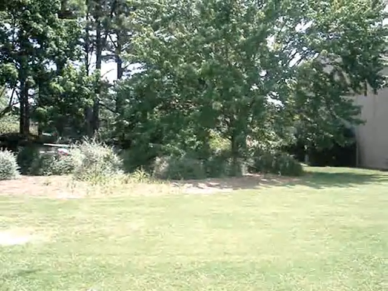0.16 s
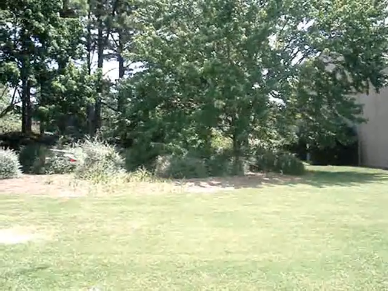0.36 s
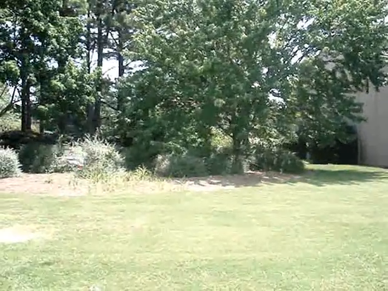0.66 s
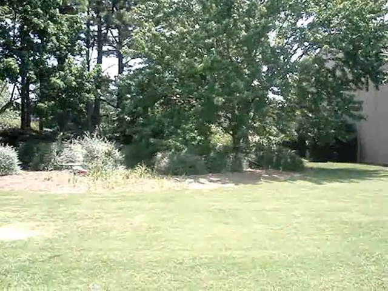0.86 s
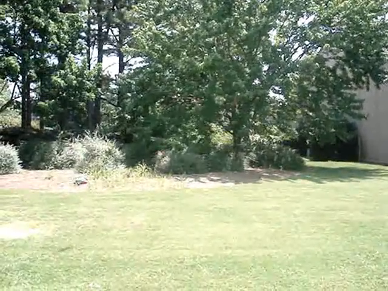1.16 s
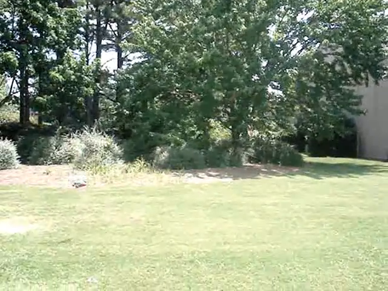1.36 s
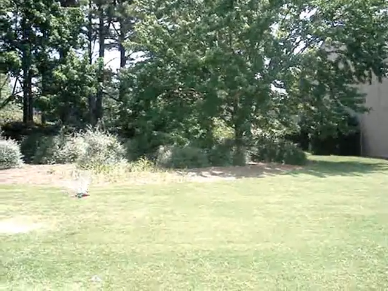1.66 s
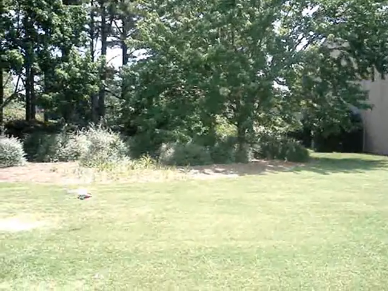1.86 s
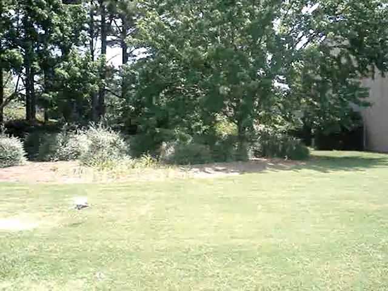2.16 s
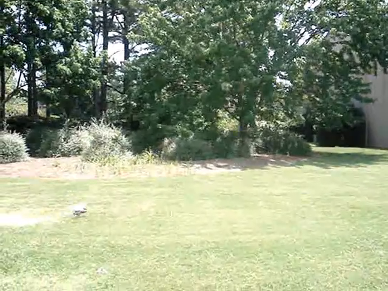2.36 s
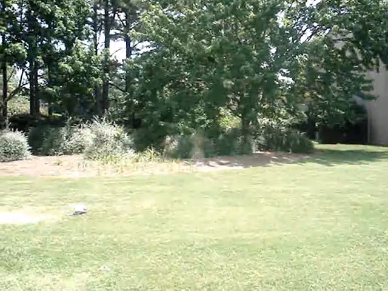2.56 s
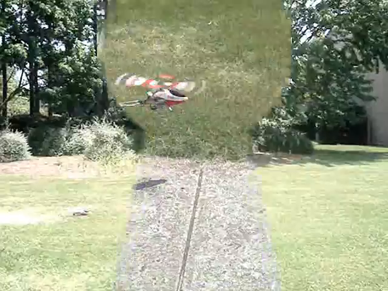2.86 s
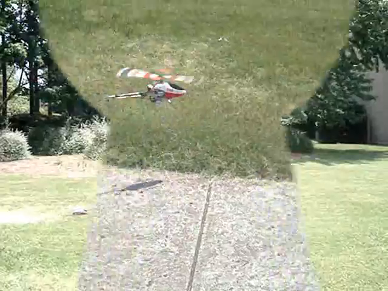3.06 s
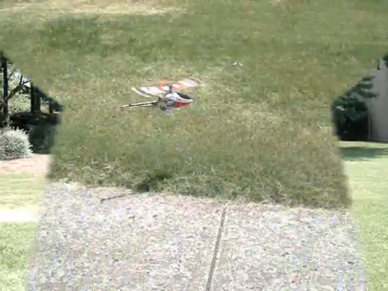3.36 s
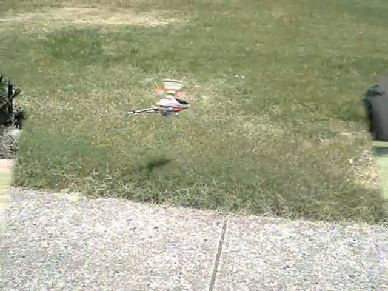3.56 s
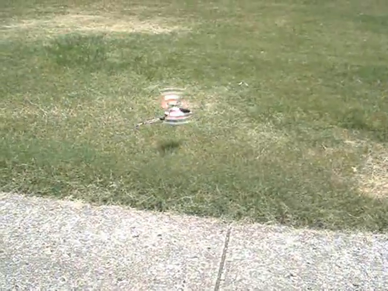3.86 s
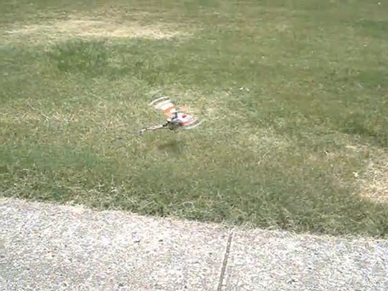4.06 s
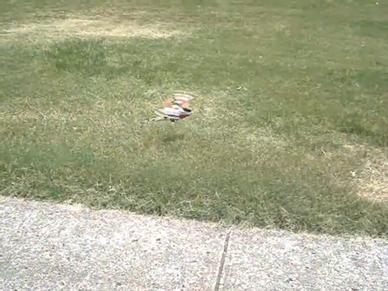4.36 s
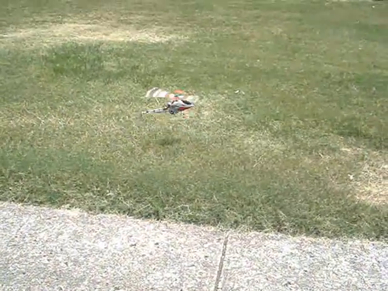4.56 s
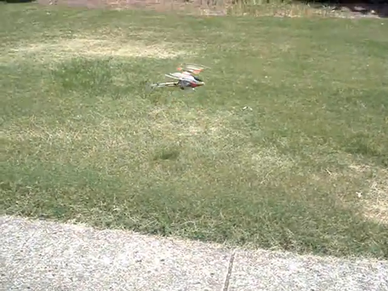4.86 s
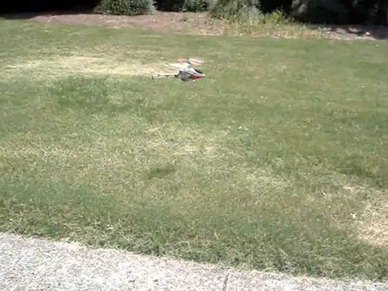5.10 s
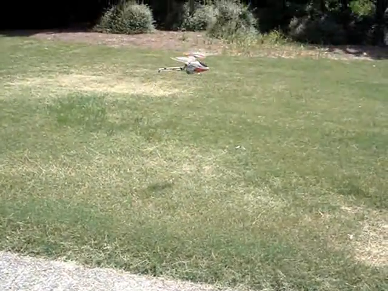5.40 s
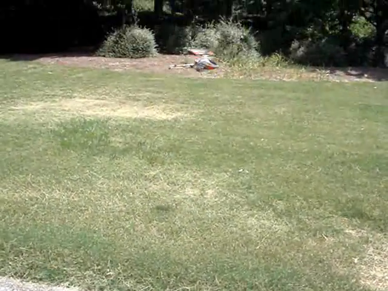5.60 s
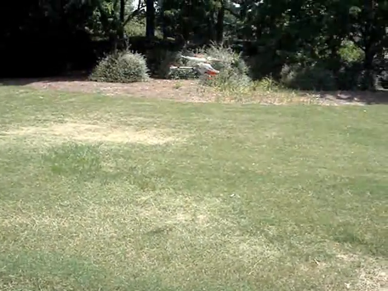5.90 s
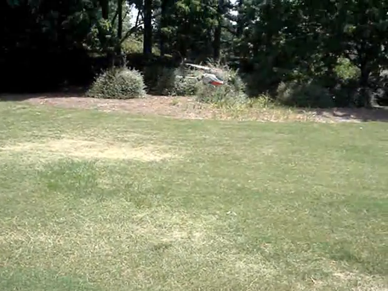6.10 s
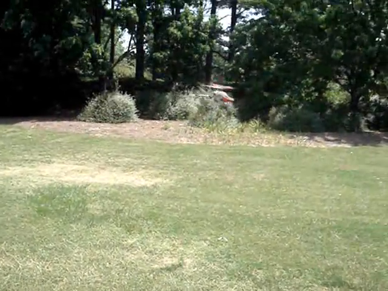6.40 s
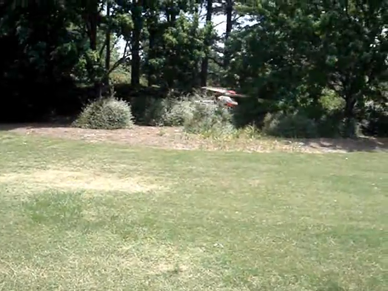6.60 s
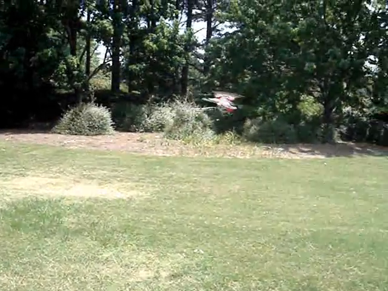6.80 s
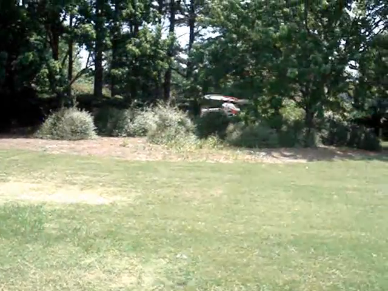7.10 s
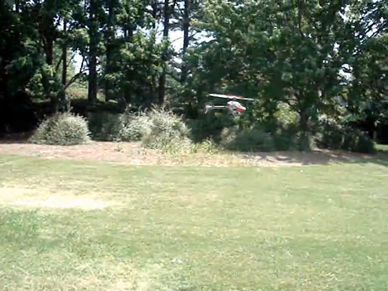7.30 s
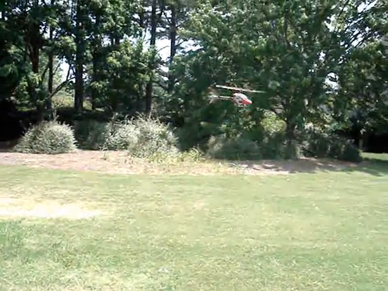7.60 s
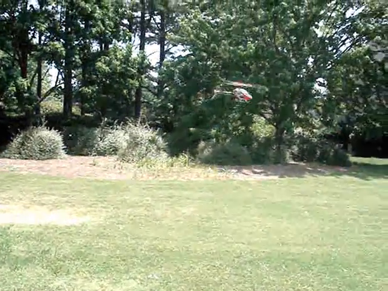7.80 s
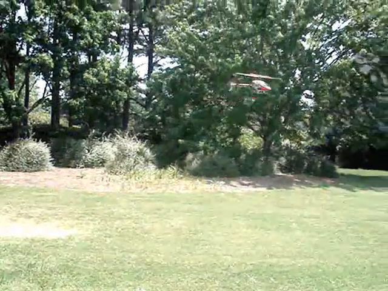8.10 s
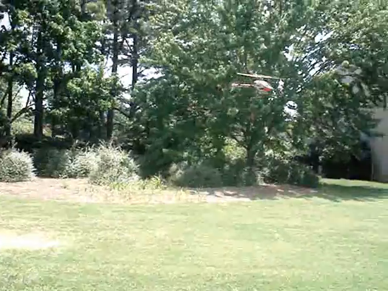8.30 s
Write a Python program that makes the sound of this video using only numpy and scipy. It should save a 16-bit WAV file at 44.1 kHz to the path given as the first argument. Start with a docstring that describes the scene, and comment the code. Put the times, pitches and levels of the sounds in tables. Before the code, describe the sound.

Outdoors on a grassy yard, a small electric helicopter whirs at a distance, its whine wavering and dropping slightly, with faint bird chirps and light wind bumps. After a quick cross-fade it is close: a fuller buzzing motor and gear whine, throbbing rapidly over hissing blade rush, rising, then easing. Strong gusts increasingly thump and rumble on the small camera's unprotected microphone.

```python
"""Electric helicopter over a lawn

A small electric helicopter flies far off, then, after a short cross-fade, close by.
Motor and gears whine at multiples of the motor speed and throb once per rotor turn; the blades rush as
pulsing noise, and a delayed, dulled copy of it all bounces off the lawn. Sliding sines make faint bird chirps.
Wind rumbles, flutters and buffets the microphone of a small camera that samples slowly and mirrors its treble."""
import sys
import numpy as np
from scipy import signal
from scipy.fft import rfft, irfft, next_fast_len
from scipy.io import wavfile

SR = 44100
rng = np.random.default_rng(int(sys.argv[2]) if len(sys.argv) > 2 else 0)


def digitize_waveform(pressure):
    """Quantize a signal to 16-bit integers and store it at the path in sys.argv[1].

    Rows of a 2-D input are taken as channels; values are limited to [-1, 1].
    """
    field = np.atleast_2d(pressure).T
    bounded = np.clip(field, -1, 1)
    quanta = np.round(bounded * 32767).astype(np.int16)
    wavfile.write(sys.argv[1], SR, quanta)


N = 372644
TIME = np.arange(N) / SR

# All spectra are shapes, scaled to rms 1 before use.
# colour of the garden air: (frequency [Hz], density [dB per Hz])
AIR_SPECTRUM = [(40, -18), (300, -11), (3000, -17), (10000, -29)]
# bird chirps: (start [s], length [s], from [Hz], to [Hz], peak level [dB])
BIRD_CHIRPS = [(1.09, .085, 3620, 3680, -41), (1.22, .035, 3800, 4450, -42), (1.893, .028, 2330, 2360, -39),
               (1.925, .07, 2440, 2370, -37), (1.995, .035, 2720, 2430, -38), (2.8, .135, 7000, 5700, -43)]

# strength of the steady wind, which drives all its layers: (time [s], strength [dB])
STEADY_WIND = [(0.0, -31.5), (0.38, -49), (0.75, -35.5), (1.45, -45.5), (2.1, -38.5), (2.4, -30),
               (2.6, -35.5), (3.1, -35), (3.7, -30.5), (4.5, -23), (4.87, -34), (5.2, -19.5), (5.5, -19),
               (5.8, -20), (6.84, -21.5), (6.92, -24.5), (7.2, -42), (7.82, -41), (7.9, -22), (8.3, -21.5),
               (8.45, -36)]
# gusts: (time [s], buffet strength [dB], peak strength of the eddies around it [dB])
WIND_GUSTS = [(0.0623, -18, -38), (0.578, -16, -38), (0.666, -14, -28.5), (0.883, -17, -43),
              (1.0436, -17, -51), (1.529, -15.5, -27), (1.618, -14, -27), (1.648, -8, -25),
              (1.6741, -8, -20.5), (2.165, -15.5, -30), (2.279, -18, -26.5), (2.38, -7.5, -32),
              (2.5442, -11, -31), (3.178, -10.5, -35), (3.571, -9, -27.5), (3.715, -1.5, -25),
              (3.812, -17, -20.5), (3.929, -7, -36), (4.219, -12, -41), (4.293, -7, -35),
              (5.0204, -4.5, -18), (5.1868, -7, -17.5), (5.4088, -6, -15), (5.4974, 9.5, -13),
              (5.5697, 2, -13.5), (5.922, -3, -31), (6.0138, -6, -15), (6.063, -3, -32), (6.195, -2, -15.5),
              (6.211, 1.5, -18), (6.225, -1, -17.5), (6.352, -1.5, -16), (6.382, -3, -25),
              (6.42, -1.5, -38), (6.483, -16, -14.5), (6.586, -22, -9.5), (6.6767, 7, -11),
              (6.761, 1.5, -11.5), (6.7905, -4, -19), (6.853, 1, -16.5), (7.25, -20, -29),
              (7.325, -18, -28), (7.51, -18, -27), (7.765, -19, -31), (7.907, -5, -14.5), (8.01, 0, -34),
              (8.1008, -1, -17), (8.119, -1, -7), (8.219, -1, -29), (8.4284, -10.5, -25)]
# how deep the wind sounds: (time [s], boost of the rumble and cut of the flutter [dB])
WIND_DEPTH = [(0, 4), (2.6, 4), (3.0, 0.5), (4.4, 0), (4.8, 4), (5.5, -0.5), (7.4, 1.5), (8.45, 4.5)]
# colours of the three wind layers: (frequency [Hz], density [dB per Hz])
RUMBLE_SPECTRUM = [(20, -24), (50, -13.5), (90, -3), (140, -1.5), (220, -5.5), (400, -50)]
GUST_SPECTRUM = [(40, -65), (129, -6.5), (241, 2), (428, -3.5), (700, -27), (910, -21.5), (1540, -120)]
FLUTTER_SPECTRUM = [(250, -25), (450, 4), (700, -2), (1000, -12.5), (1600, -23.5), (2500, -23)]
GUST_RISE_DB_S, GUST_FALL_DB_S = 312, 222   # eddies build up and die away at these rates [dB/s]
BUFFET_HZ, SHARPENS = 350, 0.61   # pitch of a 0 dB buffet [Hz]; dB of pitch per dB of strength

# the two flights: (time [s], level of rush and weak whines before their trims [dB], sizzle over that level [dB],
# lag of the lawn echo [ms], rms of the motor's fourth multiple [dB], rms of the gear mesh whine before
# its swell [dB]); the near flight adds (side shown to the microphone [steps, -2 to 5])
FAR_FLIGHT = [(0.0, -36, -8, 2.6, -37, -39), (0.29, -35, -11, 2.2, -39.5, -41),
              (0.63, -36.5, -9.5, 2, -34.5, -41), (1.05, -36, -9, 1.96, -45, -42),
              (1.3, -36, -8.5, 1.48, -43.5, -48), (1.65, -37.5, -9.5, 1.22, -36.5, -43),
              (1.9, -37.5, -9.5, 1.06, -36, -63), (2.148, -37, -10, 0.76, -48.5, -60),
              (2.39, -39, -9, 0.51, -47, -52), (2.7, -34.5, -5, 0.33, -52, -46)]
NEAR_FLIGHT = [(2.82, -40.5, -12, 1.7, -44, -67, 2), (3.0, -36, -5.5, 1.47, -44, -51, 0.5),
               (3.3, -33.5, -4.5, 1.59, -42, -34, 4.5), (3.54, -33.5, -0.5, 1.57, -40, -36, 5),
               (3.89, -29, -5.5, 1.92, -34.5, -37.5, 3.5), (4.28, -27, -11.5, 2.06, -35.5, -28, 0),
               (4.58, -28.5, -6, 1.74, -30, -29.5, 0), (4.79, -28, -6.5, 1.72, -30, -44, 3),
               (5.05, -27.5, -7.5, 2.295, -29.5, -38, 0), (5.36, -26, -9.5, 2.57, -26, -33, 4.2),
               (5.6, -28, -8.5, 3.1, -37, -31, 0.2), (5.78, -28, -8, 3.4, -32.5, -31.5, -0.6),
               (6.1, -29.5, -7, 3.5, -31.5, -31.5, -0.5), (6.58, -28.5, -9.5, 3.7, -39, -34, -2),
               (6.95, -30, -9.5, 3.63, -39, -40, -0.5), (7.27, -28, -12.5, 3.72, -40, -34, 1.5),
               (7.49, -28, -10, 4.09, -30, -30.5, 0.2), (7.97, -27, -11.5, 4.35, -31, -41, -0.2),
               (8.2, -29, -10, 4.5, -39, -43, 1), (8.45, -28, -11, 4.47, -33.5, -42, 1)]
# motor speed in each flight: (time [s], speed [turns/s])
FAR_MOTOR_SPEED = [(0.0, 341), (0.16, 346.5), (0.36, 350), (0.63, 343.3), (1.1, 333.5), (1.7, 349.7),
                   (1.9, 343.2), (2.39, 324.5), (2.6, 330.8), (2.72, 320)]
NEAR_MOTOR_SPEED = [(2.82, 355), (3.01, 346.5), (3.52, 335), (3.89, 345.5), (4.07, 350.8), (4.28, 359.5),
                    (4.59, 373), (5.05, 362.3), (5.25, 360), (5.56, 358.6), (5.74, 353.7), (6.1, 349),
                    (6.58, 351.7), (6.95, 348.8), (7.27, 357.5), (7.49, 360.5), (7.97, 348), (8.45, 347.2)]
# start and end of the cross-fade from far to near: (start [s], end [s])
CROSSFADE = (2.47, 3.04)
# colours of the blade rush, and of the sizzle on top of it: (frequency [Hz], density [dB per Hz])
FAR_RUSH_SPECTRUM = [(260, -5.5), (576, -11.5), (684, -3.5), (1210, -2.5), (1400, 0.5), (1830, -16),
                     (2360, -6), (2660, -18.5), (3200, -6.5), (4770, -10.5), (6060, -4), (7200, -18.5),
                     (9360, -61)]
NEAR_RUSH_SPECTRUM = [(530, -11.5), (900, -10), (1060, -3.5), (1200, -6.5), (1430, -1), (1990, -11),
                      (2410, -6), (2650, -9), (4460, -3.5), (4830, -8), (5360, 1), (5950, -5), (7200, -10),
                      (9360, -23.5)]
SIZZLE_SPECTRUM = [(6600, 6), (7200, -2), (8400, 5.5), (10000, 6.5)]

GEAR_RATIO = 8   # motor turns per rotor turn
# grip of the gears: (time [s], grip [0 = teeth touch half of each rotor turn, over 1 = all of it],
# swell of the mesh whine [dB])
GEAR_GRIP = [(0, 1, -3), (3.35, 1.2, -1), (3.48, .7, -6), (3.63, .8, 4), (4.08, 1.3, 0), (4.25, .75, 1),
             (4.6, .12, 0), (5.1, 1.15, 0), (6.25, 1.15, -2), (7.0, .4, 0), (7.16, .3, 6), (7.31, .6, -4),
             (7.42, 1.5, 0), (8.45, .7, 0)]
# side tones of the motor's third and fourth multiples:
# (distance [rotor harmonics], level against the whine before its wander [dB])
THIRD_SIDE_TONES = [(1, -12), (2, -19), (4, -19)]
FOURTH_SIDE_TONES = [(-1, -16), (2, -18)]
# pitches of the three middle whines: one entry per whine [multiple of motor speed]
MIDDLE_MULTIPLES = (10, 12, 24)
# rms of the middle whines: (time [s], level at 10 [dB], at 12 [dB], at 24 times motor speed [dB])
MIDDLE_LEVELS = [(0.0, -47, -42, -45), (0.63, -58, -40, -49), (1.05, -55, -39, -55), (1.65, -50, -46, -54),
                 (2.2, -50, -41, -60), (2.66, -57, -38, -58), (2.9, -56, -58, -58), (3.04, -46, -43, -52),
                 (3.3, -42, -44, -44), (3.5, -37.5, -34, -35.5), (3.89, -32.5, -38, -39),
                 (4.28, -35, -47, -46), (4.6, -36, -40, -44), (5.09, -36, -41, -42), (5.4, -36.5, -38, -44),
                 (6.0, -46, -43, -52), (6.6, -44, -48, -38.5), (7.26, -41, -40, -44), (7.6, -43, -35, -56),
                 (8.1, -46, -38, -45), (8.45, -52, -40, -42)]
# pitches of the weak whines: one entry per whine [multiple of motor speed]
WEAK_MULTIPLES = (1, 2, 5, 6, 7, 8, 9, 11, 13, 14, 16, 18, 19)
# rms of each weak whine against the flight level, at side 0 and before its wander: one entry per whine [dB]
WEAK_FAR_LEVELS = (-16, -22, -16.5, -15.5, -15.5, -17.5, -10.5, -12, -17, -30, -11, -12.5, -13.5)
WEAK_NEAR_LEVELS = (-16.5, -22.5, -14, -24, -16, -17, -14.5, -10, -10.5, -23.5, -21, -19, -19)
# what each weak whine gains as the machine turns: one entry per whine [dB per step of side]
WEAK_SIDE_GAINS = (-3.5, -2.5, -1.5, 1, -0.5, 0.5, -1.2, -1.5, -3, 2.2, .8, 1, -2)

LAWN_DULL_HZ = 2400   # the grass returns little above this
# the higher the flight, the less of the whines the lawn returns: (lag [ms], share [gain])
TONE_BOUNCE_SHARE = [(3.3, .92), (4.1, .66)]
RUSH_BOUNCE_SHARE = 0.041   # less of the rush, which is spread over the whole rotor

CAMERA_RATE_HZ, CUTOFF_HZ = 19900, 15750
# mirrored treble: (frequency of the image [Hz], level of the image against its source [dB])
MIRROR_LEVELS = [(10000, -9), (11500, -13.5), (15500, -18.5)]


def from_db(db):
    """Gain of a level in dB."""
    return 10 ** (np.asarray(db) / 20)


def rms_one(x):
    """Scale to rms 1."""
    return x / np.sqrt(np.mean(x ** 2) + 1e-20)


def in_time(rows):
    """Columns of a curve table, sample by sample."""
    seconds, *columns = np.transpose(rows)
    return [np.interp(TIME, seconds, column) for column in columns]


def coloured(x, spectrum):
    """Filter to a spectrum of (Hz, dB) points; rms 1."""
    size = next_fast_len(N)
    points_hz, points_db = np.transpose(spectrum)
    hz = np.arange(size // 2 + 1) * SR / size
    gain_db = np.interp(np.log(hz + 1), np.log(points_hz), points_db, left=-60, right=-60)
    return rms_one(irfft(rfft(x, size) * from_db(gain_db), size)[:N])


def drift(rate):
    """Slow random wander of spread 1, about rate changes a second."""
    # low-passed noise on a grid of 200 knots a second
    knots = rng.standard_normal(int(N / SR * 200) + 400)
    r = np.exp(-2 * np.pi * rate / 200)
    slow = rms_one(signal.lfilter([1], [1, -2 * r, r * r], knots)[398:])
    return np.interp(TIME * 200, np.arange(len(slow)), slow)


def garden_air():
    """Steady coloured noise: the quiet air of the garden."""
    return from_db(-38.5) * coloured(rng.standard_normal(N), AIR_SPECTRUM)


def birds():
    """Faint chirps: short sines whose pitch glides in a straight line."""
    out = np.zeros(N)
    for start, length, from_hz, to_hz, db in BIRD_CHIRPS:
        part = np.clip((TIME - start) / length, 0, 1)
        envelope = np.sqrt(np.abs(np.sin(np.pi * part)))
        pitch_hz = from_hz + (to_hz - from_hz) * part
        out += from_db(db) * envelope * np.sin(2 * np.pi * np.cumsum(pitch_hz) / SR)
    return out


def wind_strength():
    """The steady wind with the swell of every gust on top, added as powers, in dB."""
    power = from_db(2 * in_time(STEADY_WIND)[0])
    for start, _, db in WIND_GUSTS:
        near = slice(max(int(start * SR) - 9000, 0), int(start * SR) + 9000)
        t = TIME[near] - start
        swell_db = db + np.minimum(GUST_RISE_DB_S * t, -GUST_FALL_DB_S * t)
        power[near] += from_db(2 * swell_db)
    return 10 * np.log10(power)


def wind():
    """Eddies on the port: light air only rumbles; a stronger gust moves up in pitch and adds bright flutter."""
    strength_db = wind_strength()
    depth_db, = in_time(WIND_DEPTH)
    lumps, fine = drift(32.0), drift(75)

    def eddies(spectrum, lumps_db, fine_db):
        """Coloured noise whose level wanders with the shared lumps and fine grain; rms 1."""
        return rms_one(coloured(rng.standard_normal(N), spectrum) * from_db(lumps_db * lumps + fine_db * fine))

    rumble = eddies(RUMBLE_SPECTRUM, 2.0, 3.0)
    gust = eddies(GUST_SPECTRUM, 2.8, 1.6)
    flutter = eddies(FLUTTER_SPECTRUM, 2.4, 4.0)
    # the brighter the layer, the faster it grows with the wind
    return (from_db(0.85 * strength_db - 11.5 + depth_db) * rumble
            + from_db(1.1 * strength_db - 2.5 - 0.96 * depth_db) * gust
            + from_db(1.84 * strength_db + 3.4 - depth_db) * flutter)


def buffets(rebound, rebound_width):
    """Each buffet sucks the diaphragm out inside a wider, shallower swing back; harder ones are shorter."""
    out = np.zeros(N)
    for start, db, _ in WIND_GUSTS:
        near = slice(max(int(start * SR) - 600, 0), int(start * SR) + 600)
        pitch_hz = BUFFET_HZ * from_db(SHARPENS * db)
        t = (TIME[near] - start) * pitch_hz * 4   # in quarter cycles
        suck = (1 + rebound) * np.exp(-1.6 * t ** 2)
        swing_back = rebound * np.exp(-(t / rebound_width) ** 2)
        out[near] -= from_db(db) * (suck - swing_back)
    return 0.53 * out


def lawn_echo(x, lag_ms, share):
    """The dull bounce off the lawn lags more as the machine climbs, weakening or boosting each tone in turn."""
    hz = np.arange(N // 2 + 1) * SR / N
    dull = irfft(rfft(x) / (1 + (hz / LAWN_DULL_HZ) ** 4), N)
    return x + share * np.interp(TIME - lag_ms / 1000, TIME, dull)


def gear_load(motor_turns):
    """The eccentric main gear presses on the pinion, then lets go for part of the turn: near +1 or -1."""
    grip = in_time(GEAR_GRIP)[0]
    return np.tanh(6.0 * (np.cos(2 * np.pi * motor_turns / GEAR_RATIO) + grip + .33 * drift(9)))


def gear_rattle(motor_turns, memory):
    """Tooth errors come round again every rotor turn, changing a little from turn to turn."""
    # one row of 1024 points per rotor turn; each row keeps some of the row before
    fresh = rng.standard_normal((int(N / SR * 50) + 30, 1024))
    pattern = signal.lfilter([1], [1, -memory], fresh, axis=0)[20:]
    position = motor_turns / GEAR_RATIO * 1024
    return rms_one(np.interp(position, np.arange(pattern.size), pattern.ravel()))


def blade_rush(turns, chop):
    """Air noise that pulses with the rotor and, faster, with the motor."""
    beat = 1 + chop * np.cos(2 * np.pi * turns / GEAR_RATIO) + .24 * np.cos(2 * np.pi * turns)
    return beat * rng.standard_normal(N) * from_db(.7 * drift(9))


def whine(motor_turns, load, multiple, throb, wobble):
    """One tone of rms near 1; its level follows the gear load, its phase swings every rotor turn."""
    lead, start = rng.uniform(0, 2 * np.pi, 2)
    swing = np.cos(2 * np.pi * motor_turns / GEAR_RATIO + lead)
    phase = 2 * np.pi * multiple * motor_turns + wobble * swing + 0.47 * drift(5.7) + start
    return np.sqrt(2) * rms_one(1 + throb * load) * np.sin(phase)


def motor_whine(turns, load, multiple, side_tones):
    """A steady motor tone, with wandering side tones set off from it by rotor harmonics."""
    out = whine(turns, load, multiple, throb=0.05, wobble=0.06)
    for away, db in side_tones:
        side_tone = whine(turns, load, multiple + away / GEAR_RATIO, throb=0.05, wobble=0.06)
        out = out + from_db(db + 3 * drift(3)) * side_tone
    return out


def mesh_whine(turns, load, mesh_db):
    """The gear teeth whine at 15 times motor speed, nearly silenced while they let go."""
    swell_db = in_time(GEAR_GRIP)[1]
    return from_db(mesh_db + swell_db) * whine(turns, load, 15, throb=0.95, wobble=0.3)


def middle_whines(turns, load):
    """Three more multiples of the motor speed, each on its own level curve."""
    return sum(from_db(db) * whine(turns, load, multiple, throb=0.19, wobble=0.43)
               for multiple, db in zip(MIDDLE_MULTIPLES, in_time(MIDDLE_LEVELS)))


def weak_whines(turns, load, levels_db, side, wander_db):
    """Weak tones that follow the side shown, each swelling and fading a little on its own."""
    out = np.zeros(N)
    for multiple, db, side_db in zip(WEAK_MULTIPLES, levels_db, WEAK_SIDE_GAINS):
        level = from_db(db + side_db * side + wander_db * drift(3.1))
        out += level * whine(turns, load, multiple, throb=0.15, wobble=0.44)
    return out


def helicopter(speeds, flight, spectrum, weak_db, third_db, rattle_db, rush_db, chop, wander_db):
    """Whines, gear rattle and blade rush, all locked to the motor speed, and their bounce off the lawn."""
    speed, = in_time(speeds)
    level_db, sizzle_db, lag_ms, motor_db, mesh_db, *turning = in_time(flight)
    side = sum(turning)   # 0 where the flight has no side column
    turns = np.cumsum(speed) / SR
    load = gear_load(turns)

    third = motor_whine(turns, load, 3, THIRD_SIDE_TONES)
    fourth = motor_whine(turns, load, 4, FOURTH_SIDE_TONES)
    motor = from_db(motor_db) * (from_db(third_db) * third + fourth)
    gears = mesh_whine(turns, load, mesh_db) + middle_whines(turns, load)
    weak = from_db(level_db) * weak_whines(turns, load, weak_db, side, wander_db)

    # the rattle drops to half while the teeth let go
    rattle = from_db(rattle_db) * (.75 + .25 * load) * gear_rattle(turns, memory=0.59)
    noise = blade_rush(turns, chop) + rattle
    body = from_db(rush_db) * coloured(noise, spectrum)
    sizzle = from_db(sizzle_db) * coloured(noise, SIZZLE_SPECTRUM)

    tone_share = np.interp(lag_ms, *np.transpose(TONE_BOUNCE_SHARE))
    tones = lawn_echo(motor + gears + weak, lag_ms, tone_share)
    return tones + from_db(level_db) * lawn_echo(body + sizzle, lag_ms, RUSH_BOUNCE_SHARE)


def scene():
    """Two flights joined by a cross-fade, over wind, birds and the air of the garden."""
    background = garden_air() + birds() + wind() + buffets(rebound=0.62, rebound_width=2.35)
    far = helicopter(FAR_MOTOR_SPEED, FAR_FLIGHT, FAR_RUSH_SPECTRUM, WEAK_FAR_LEVELS,
                     third_db=-7.5, rattle_db=-3, rush_db=3.0, chop=0.14, wander_db=1.5)
    near = helicopter(NEAR_MOTOR_SPEED, NEAR_FLIGHT, NEAR_RUSH_SPECTRUM, WEAK_NEAR_LEVELS,
                      third_db=-1.4, rattle_db=-1.0, rush_db=-0.5, chop=0.15, wander_db=2.2)
    near_share = np.interp(TIME, CROSSFADE, (0, 1))
    return (background + (1 - near_share) * far + near_share * near)[None]


def record(dry):
    """Slow sampling cuts the sound at half the camera's rate and leaves a weak mirror image above it."""
    size = next_fast_len(N)
    hz = np.arange(size // 2 + 1) * SR / size
    below = hz < CAMERA_RATE_HZ / 2
    kept = irfft(rfft(dry, size) * below, size)[:, :N]
    # multiplying by a tone at the sampling rate flips the spectrum into the treble
    folded = rfft(2 * kept * np.cos(2 * np.pi * CAMERA_RATE_HZ * TIME), size)
    image_gain = from_db(np.interp(hz, *np.transpose(MIRROR_LEVELS)))
    mirror = irfft(folded * ~below * image_gain, size)[:, :N]
    soft_clipped = 0.93 * np.tanh(kept / 0.94)
    circuit_hiss = from_db(-51.5) * rng.standard_normal(dry.shape)
    lowpass = signal.ellip(12, .5, 80, CUTOFF_HZ, fs=SR, output="sos")
    return signal.sosfilt(lowpass, soft_clipped + mirror + circuit_hiss)


dry = scene()
out = record(dry)
digitize_waveform(out)
```